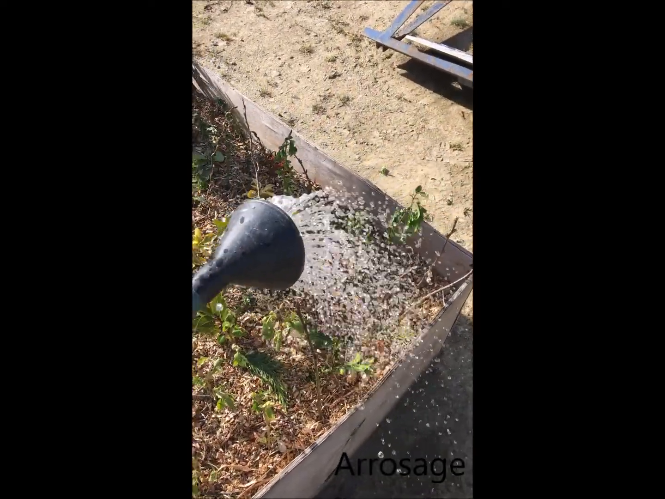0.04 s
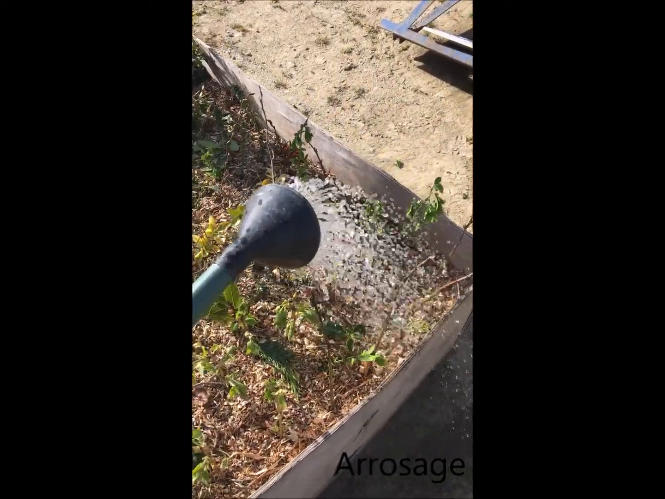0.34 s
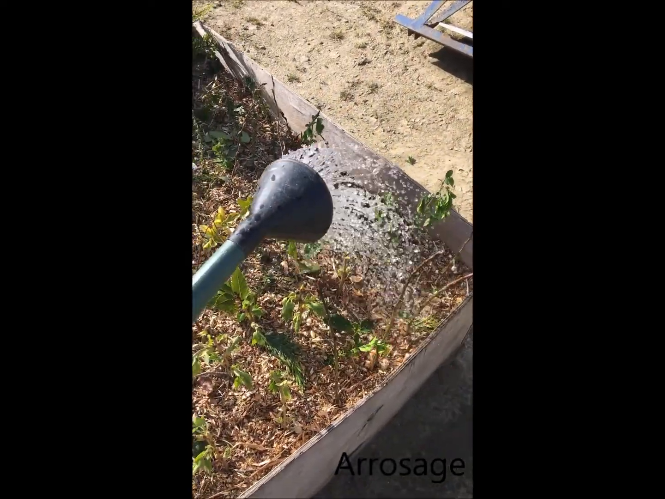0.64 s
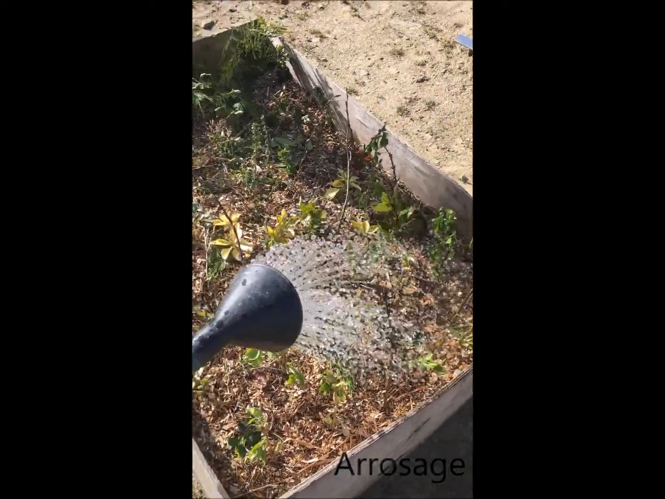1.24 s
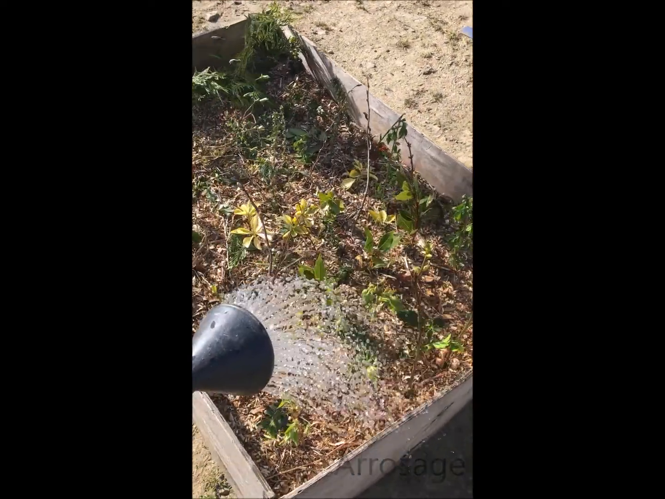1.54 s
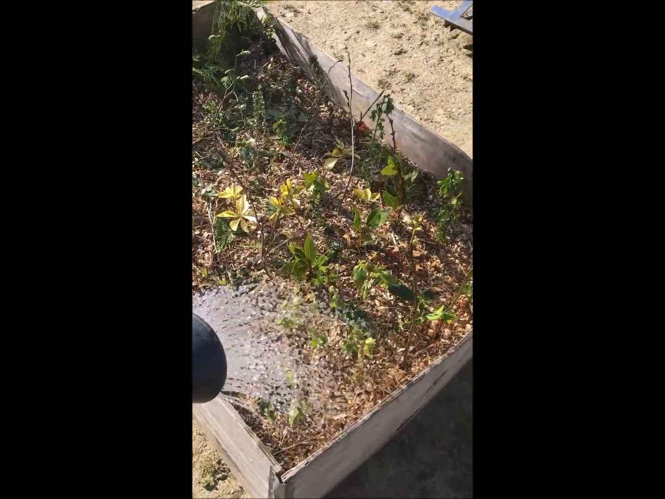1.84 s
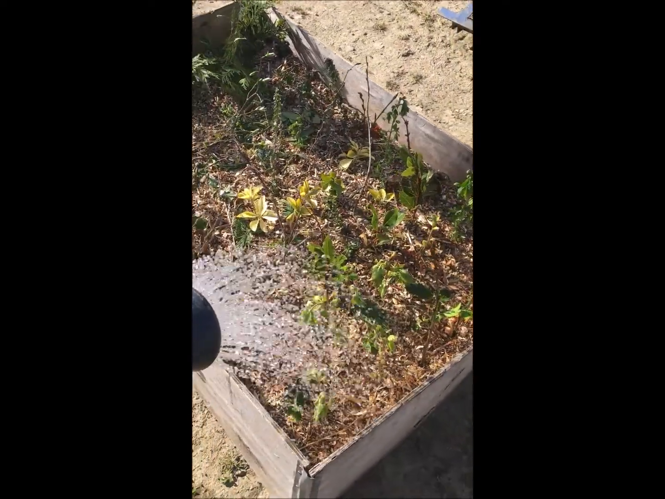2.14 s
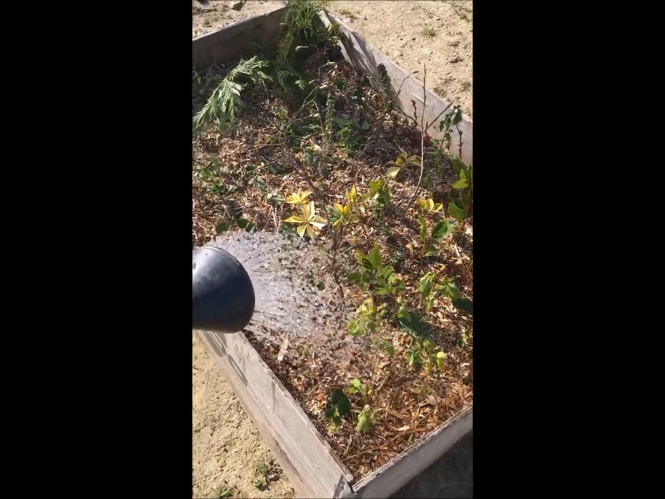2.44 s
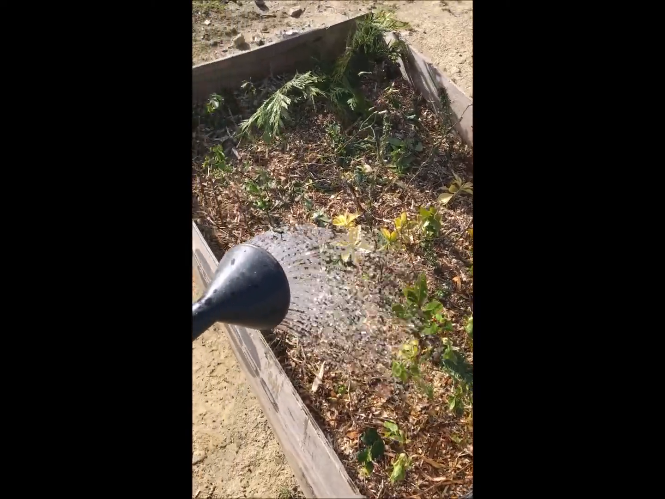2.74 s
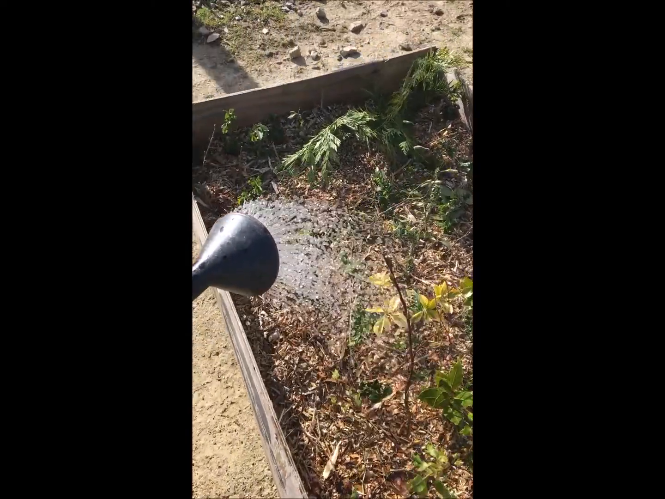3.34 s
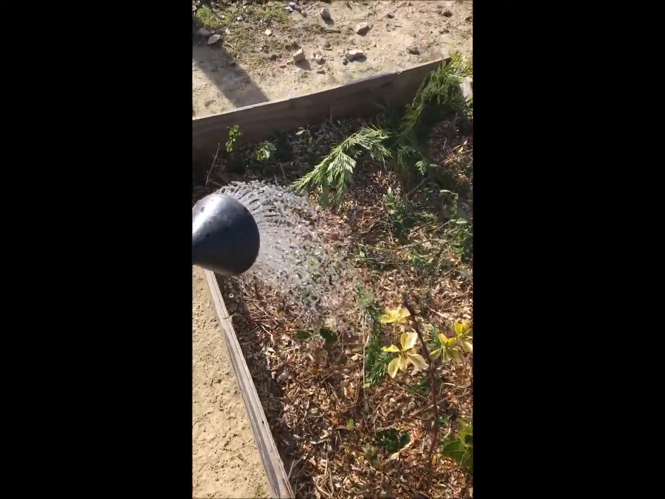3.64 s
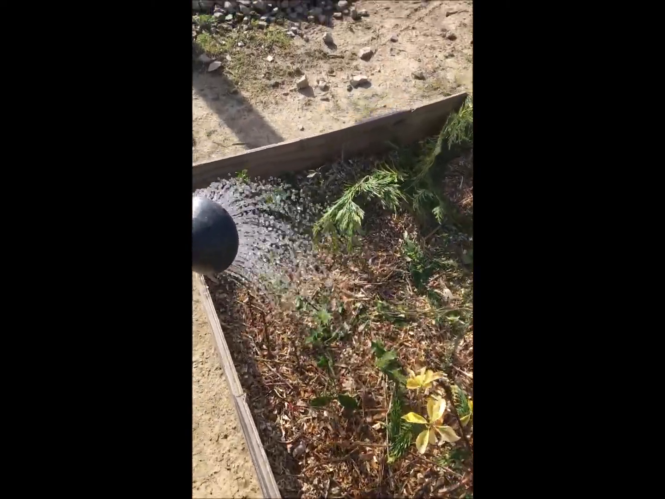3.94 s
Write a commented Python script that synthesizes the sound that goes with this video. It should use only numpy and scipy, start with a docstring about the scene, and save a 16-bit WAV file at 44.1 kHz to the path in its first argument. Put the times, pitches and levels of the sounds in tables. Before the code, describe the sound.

Water sprinkles from a watering can onto bark mulch and leaves, close up outdoors. From the start, fine drops hiss and tick while fatter ones splat on wet ground. Gusts rumble on the microphone, hardest in the first 1.5 seconds. The spray then eases and a few drops plop faintly into puddles. It swells again towards 3 seconds and carries on, slightly softer, until 4 seconds.

```python
"""Outdoors, close to a raised bed of bark mulch and leaves, under a watering can's rose.
From the start fine drops tick, fat ones splat and the wet ground patters; gusts buffet the microphone,
hardest in the first 1.5 s. Then the spray eases and a few drops plop into puddles. It swells again
towards 3 s, and a faint squeak falls at 3.6 s. The sound briefly drops out now and then, bar the wind."""
import sys
import numpy as np
from scipy import signal
from scipy.fft import rfft, irfft
from scipy.io import wavfile
from scipy.ndimage import uniform_filter1d

SR = 44100
rng = np.random.default_rng(int(sys.argv[2]) if len(sys.argv) > 2 else 0)


def wav_record(signal):
    """Record a signal, one row per channel, as 16-bit PCM in the file named by sys.argv[1]."""
    frames = np.transpose(np.atleast_2d(signal))
    bounded = np.clip(frames, -1, 1)
    # unit amplitude maps onto the largest positive 16-bit level
    quanta = np.round(bounded * 32767).astype(np.int16)
    wavfile.write(sys.argv[1], SR, quanta)


N = 176400


def shower():
    """The bright spray, close up: ringing fine drops, fat splats, snaps on leaves and tiny bubbles."""
    # treble of the spray as it moves over the bed: (time [s], level [dB])
    sweep = [(0, -36), (.17, -37.5), (.48, -33), (.62, -35), (.85, -38), (1.05, -34.5), (1.37, -36.5),
             (1.63, -40), (2.05, -38.5), (2.3, -36.3), (2.55, -37.5), (2.9, -35), (3.12, -35.5),
             (3.55, -39), (3.83, -37), (4, -40)]
    # colour of the spray: (frequency [Hz], relative gain [dB])
    colour = [(3000, -37.5), (6500, -16.5), (7900, -9.5), (8900, -4), (9800, -2), (10400, -7.5),
              (10900, -2), (13000, -1), (14300, 0.5), (16000, 0)]
    fine = scatter(impacts(per_s=6100, spread_db=4.5), 5400, 17200, width_hz=2200)
    splats = scatter(impacts(per_s=760, spread_db=3.5), 5150, 16200, width_hz=2800, splash_s=0.0013)
    snaps = scatter(impacts(per_s=130, spread_db=3), 7500, 15900, width_hz=3000)
    fizz = scatter(impacts(per_s=1400, spread_db=1), 6000, 16360, width_hz=75, count=60)
    drops = fine + from_db(-1) * splats + snaps + from_db(2.5) * fizz
    return level(sweep) * coloured(drops, colour)


def patter():
    """Heavier drops knock on bark chips and leaves, which ring for a few cycles."""
    # patter on chips and leaves: (time [s], level [dB])
    strength = [(0, -45.5), (.2, -44), (.4, -44), (.52, -40.5), (.62, -46.5), (1.0, -45.5), (1.32, -44.5),
                (1.5, -51), (1.75, -49), (2.2, -46.5), (2.55, -46), (2.9, -44.5), (3.2, -45.5),
                (3.5, -48.5), (4, -48.5)]
    # colour of the patter: (frequency [Hz], relative gain [dB])
    colour = [(1200, -12), (1850, -11.5), (2250, -5), (2750, -9), (3250, -4.5), (4400, -4), (4950, -6),
              (5500, -0.5), (6000, 1.5), (7000, -1), (8000, -9.5), (12000, -27)]
    ticks = rms_one(impacts(per_s=5500, spread_db=7.5))
    chips = scatter(impacts(per_s=2000, spread_db=3), 2060, 7900, width_hz=790)
    bubbles = scatter(impacts(per_s=550, spread_db=2.5), 1918, 7390, width_hz=75, count=48)
    return level(strength) * coloured(ticks + chips + from_db(-3) * bubbles, colour)


def loud_drops():
    """Single fat drops stand out, smacking a leaf or wet chip or plopping into a puddle."""
    # smacks: (time [s], relative peak [dB], ring [Hz], splash decay [s])
    smacks = [(.051, -22, 3900, 0.001), (.052, -23, 6940, 0.0006), (.133, -18, 13000, 0.0015),
              (.134, -22.5, 3280, 0.0014), (.168, -16, 12000, .0009), (.275, -13, 14000, .002),
              (.422, -24, 8500, 0.0019), (.508, -17.5, 5550, .001), (.539, -17.5, 6000, 0.00053),
              (.565, -20, 11500, 0.0026), (.934, -23, 5400, 0.0005), (.993, -23, 13600, .0004),
              (1.303, -22, 9000, .0015), (1.313, -17, 6000, 0.00019), (1.341, -23, 5750, 0.00038),
              (1.394, -29, 3440, 0.00092), (2.06, -36, 1460, 0.0022), (2.106, -35.5, 1370, 0.0032),
              (2.139, -27, 7600, 0.0013), (2.169, -34, 1460, 0.0014), (2.170, -32, 5040, .0006),
              (2.29, -28, 4270, 0.00086), (2.353, -31, 3960, 0.00092), (2.375, -16, 13500, 0.0013),
              (2.479, -20.5, 9500, 0.0026), (2.494, -22, 7940, .0005), (3.002, -10, 14100, 0.00059),
              (3.105, -16, 13500, 0.0018), (3.345, -35.5, 2600, 0.0035), (3.375, -23.5, 5640, 0.0012),
              (3.816, -14, 13000, 0.00077), (3.817, -23, 6000, 0.0009), (3.892, -21, 6850, 0.00063),
              (3.894, -33, 3040, 0.0018)]
    # plops: (time [s], relative peak [dB], pitch [Hz], decay [s])
    plops = [(.707, -42, 1610, 0.0046), (1.482, -35.5, 1220, 0.0073), (1.679, -35.5, 1430, 0.012),
             (1.96, -34, 1820, 0.0034), (3.311, -32.5, 1280, 0.0079), (3.344, -33, 1290, .003)]
    return from_db(-2.5) * single_drops(smacks, q=1.7) + from_db(-5) * single_drops(plops, q=2.6)


def wet_ground():
    """Soft thuds and small short-lived bubbles in the soaked mulch."""
    # low patter on wet ground: (time [s], relative level [dB])
    soak = [(0, -56.5), (.25, -57.5), (.5, -58.5), (.7, -54.5), (.95, -63.5), (1.1, -55), (1.6, -55.5),
            (2.2, -54), (2.85, -52), (3.05, -55.5), (4, -53.5)]
    # colour of the wet ground: (frequency [Hz], relative gain [dB])
    colour = [(100, -17.5), (200, 3.5), (280, 9), (370, 8.5), (520, -2), (700, -2), (1000, 0), (1300, 0),
              (1800, -5), (2250, -6), (2600, -5), (4000, -9.5)]
    thuds = rms_one(impacts(per_s=2500, spread_db=2.5))
    bubbles = scatter(impacts(per_s=600, spread_db=1.5), 376, 2873, width_hz=120)
    return from_db(5) * level(soak) * coloured(thuds + from_db(-10) * bubbles, colour)


def ringing_patches():
    """The spray crosses patches of leaves and hollow bark; each rings at its own pitch."""
    # patches under the spray: (time [s], half length [s], ring [Hz], level [dB])
    patches = [(0.99, 0.55, 3240, -56.5), (0.85, 0.94, 4470, -61), (2.67, 0.27, 2280, -58),
               (2.59, 0.4, 3750, -57), (2.74, 0.35, 944, -61.5)]
    out = 0
    for s, half_s, hz, db in patches:
        knocks = impacts(per_s=900, spread_db=2.5)
        out += from_db(db) * bump(s, half_s) * rms_one(ring(knocks, hz, q=7.6))
    return out


def squeak(start_s=3.624, length_s=0.025):
    """One faint, short whistle that glides down."""
    progress = np.clip((np.arange(N) / SR - start_s) / length_s, 0, 1)
    hz = np.interp(progress, [0, 1], [6450, 5300])
    return from_db(-41) * np.sin(np.pi * progress) * np.sin(2 * np.pi * np.cumsum(hz) / SR)


def dropouts():
    """Brief dropouts in the sound, as a gain in dB."""
    # flat-bottomed dropouts: (time [s], half length [s], depth [dB])
    gaps = [(.022, .007, 14), (.192, .007, 13), (.918, .007, 14), (1.367, .007, 14), (1.431, .0065, 14),
            (2.006, .006, 13), (2.327, .006, 13), (2.455, .006, 12), (2.561, .005, 12), (2.936, .0125, 52),
            (3.457, .006, 14), (3.606, .006, 12)]
    t = np.arange(N) / SR
    return -sum(depth * np.exp(-((t - s) / half_s) ** 4) for s, half_s, depth in gaps)


def wind(breeze_db=-39, low_cut_hz=33.3):
    """Puffs rumble on the microphone over a steady breeze; the sharper ones add a higher rasp."""
    # puffs: (time [s], half length [s], relative rumble [dB], relative rasp [dB])
    gusts = [(0.044, 0.029, -28.5, -50.5), (0.088, 0.0093, -32, -36.5), (0.251, 0.016, -28.5, -36),
             (0.427, 0.022, -39, -23.5), (0.481, 0.047, -20.5, -29.5), (0.609, 0.022, -22.5, -31.5),
             (0.654, 0.0094, -27, -41), (0.711, 0.038, -26, -35), (0.823, 0.027, -25.5, -34.5),
             (0.881, 0.016, -28.5, -35), (0.948, 0.028, -31.5, -43.5), (1.067, 0.012, -21.5, -44.5),
             (1.145, 0.045, -25.5, -36), (1.246, 0.034, -20.5, -54), (1.304, 0.021, -18, -40),
             (1.406, 0.014, -26.5, -60), (1.548, 0.011, -26, -40), (1.618, 0.026, -27.5, -67),
             (1.753, 0.03, -35.5, -64), (1.822, 0.022, -26, -42.5), (1.912, 0.02, -24.5, -42),
             (1.958, 0.011, -26.5, -64), (2.079, 0.027, -29.5, -64), (2.211, 0.013, -27.5, -57),
             (2.339, 0.0094, -29, -63), (2.475, 0.0072, -29, -38), (2.569, 0.016, -34.5, -53),
             (2.684, 0.032, -26.5, -41), (2.762, 0.01, -28, -57), (2.85, 0.13, -35, -66),
             (3.065, 0.049, -40, -58), (3.204, 0.059, -35, -65), (3.406, 0.04, -31, -74),
             (3.503, 0.014, -24.5, -54), (3.575, 0.029, -34, -70), (3.675, 0.024, -27, -67),
             (3.777, 0.083, -35, -60), (3.84, 0.011, -29.5, -50.5), (3.978, 0.034, -37, -71)]
    # colour of the rumble: (frequency [Hz], relative gain [dB])
    rumble_colour = [(15, -45.5), (25, 4), (33, -0.5), (44, 7.5), (70, 2.5), (110, -6.5), (160, -19),
                     (300, -37), (700, -57.5)]
    # colour of the rasp: (frequency [Hz], relative gain [dB])
    rasp_colour = [(50, -8), (120, 4), (190, 5), (280, -3.5), (480, -16), (700, -27), (1500, -54)]
    puffs = from_db(1) * sum(from_db(db) * bump(s, half_s) for s, half_s, db, _ in gusts)
    sharp_puffs = sum(from_db(db) * bump(s, half_s) for s, half_s, _, db in gusts)
    rumble = np.hypot(from_db(breeze_db), puffs) * eddies(rumble_colour, even_s=0.0254)
    rasp = sharp_puffs * eddies(rasp_colour, even_s=0.039)
    # the microphone ignores the slowest pressure swings
    low_cut = signal.butter(3, low_cut_hz, "high", fs=SR, output="sos")
    return signal.sosfiltfilt(low_cut, rumble + rasp)


def eddies(colour, even_s):
    """Turbulence of a given colour, evened out so that the gusts set its level."""
    noise = coloured(rng.standard_normal(N), colour)
    power = uniform_filter1d(noise ** 2, int(even_s * SR))
    return noise / np.sqrt(power + .05)


def impacts(per_s, spread_db):
    """Random clicks of either sign: many small, a few large."""
    sizes = from_db(spread_db * np.minimum(rng.exponential(1, N), 4.7))
    return (rng.random(N) < per_s / SR) * sizes * rng.choice([-1, 1], N)


def scatter(clicks, low_hz, high_hz, width_hz, splash_s=0, count=24):
    """Each click lands on one of many small resonators, as a dying splash if splash_s is set."""
    target = rng.integers(0, count, N)
    noise = rng.standard_normal(N)
    pitches = low_hz + (high_hz - low_hz) * (np.arange(count) + rng.random(count)) / count
    out = 0
    for k, hz in enumerate(pitches):
        hits = clicks * (target == k)
        if splash_s:
            decay = np.exp(-1 / (splash_s * SR))
            hits = noise * signal.lfilter([1], [1, -decay], np.abs(hits) + 1e-18)
        out += resonate(hits, hz, width_hz)
    return rms_one(out)


def single_drops(rows, q):
    """Each row is a dying splash that rings at its own pitch."""
    out, t = np.zeros(N + SR), np.arange(SR // 20) / SR
    for s, db, hz, decay_s in rows:
        splash = rng.standard_normal(len(t)) * np.exp(-t / decay_s)
        drop = ring(splash, hz, q)
        start = int(s * SR)
        out[start:start + len(t)] += from_db(db) * drop / np.abs(drop).max()
    return out[:N]


def ring(x, hz, q):
    """Two like resonances in series; a higher q rings longer."""
    return resonate(resonate(x, hz, hz / q), hz, hz / q)


def resonate(x, hz, width_hz):
    """A resonance with gain 1 at its top."""
    r = np.exp(-np.pi * width_hz / SR)
    feedback = [1, -2 * r * np.cos(2 * np.pi * hz / SR), r * r]
    return signal.lfilter(np.array([1, 0, -1]) * (1 - r * r) / 2, feedback, x + 1e-18)


def coloured(x, colour):
    """Colour a signal with a causal filter, so that attacks stay sharp; unit rms."""
    hz, db = np.transpose(colour)
    bin_hz = np.maximum(np.arange(N // 2 + 1) * SR / N, 1)
    gain = from_db(np.interp(np.log(bin_hz), np.log(hz), db))
    cepstrum = irfft(np.log(gain), N)
    minimum_phase = np.exp(rfft(2 * cepstrum[:N // 2], N) - cepstrum[0])
    return rms_one(irfft(rfft(x) * minimum_phase, N))


def level(rows):
    """A (time [s], level [dB]) curve as a gain for every sample."""
    return from_db(np.interp(np.arange(N) / SR, *np.transpose(rows)))


def bump(s, half_s):
    """A smooth swell of height 1 around a moment."""
    return np.exp(-((np.arange(N) / SR - s) / half_s) ** 2)


def from_db(db):
    """Decibels to gain."""
    return 10 ** (np.asarray(db) / 20)


def rms_one(x):
    """Scale to unit rms."""
    return x / np.sqrt(np.mean(x ** 2) + 1e-20)


def scene():
    """Water and wind at one microphone beside the bed."""
    dropout_db = dropouts()
    ground = patter() + ringing_patches() + wet_ground() + loud_drops() + squeak()
    spray = shower() * from_db(np.minimum(dropout_db + 8, 0))   # dropouts are 8 dB shallower here
    return (spray + ground * from_db(dropout_db) + wind())[None]


def record(dry):
    """The top is cut steeply above 15850 Hz."""
    return signal.sosfilt(signal.ellip(12, .1, 80, 15850, fs=SR, output="sos"), dry)


dry = scene()
out = record(dry)
wav_record(out)
```